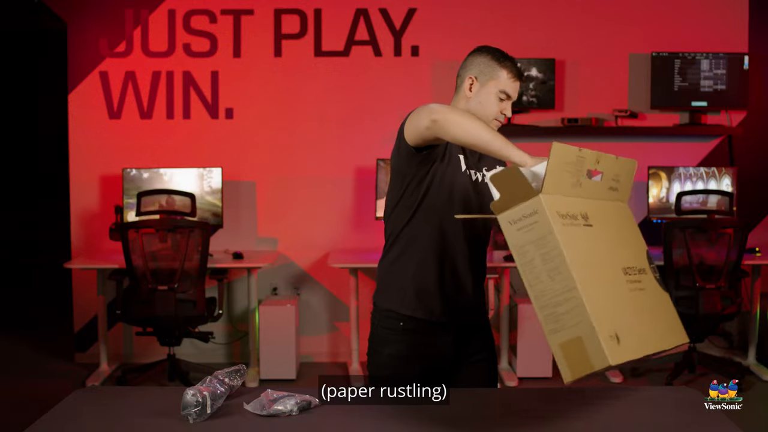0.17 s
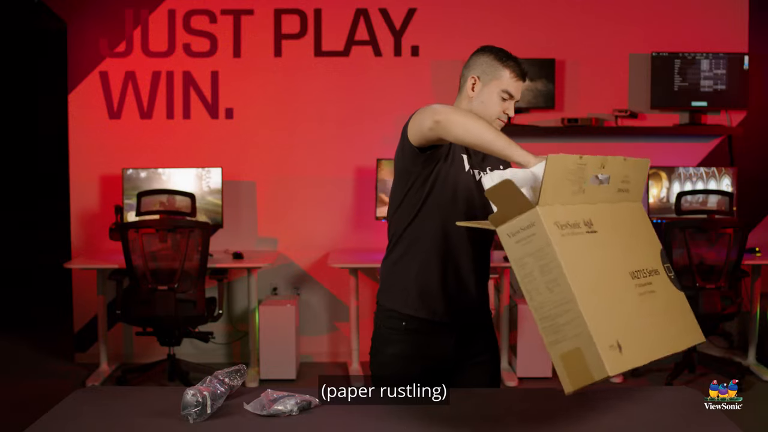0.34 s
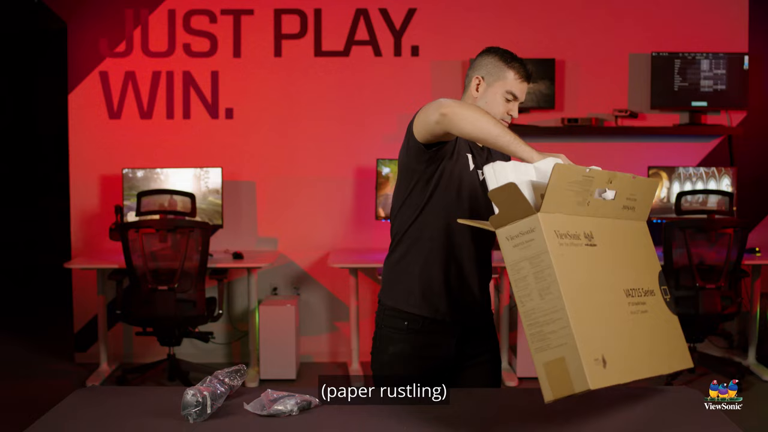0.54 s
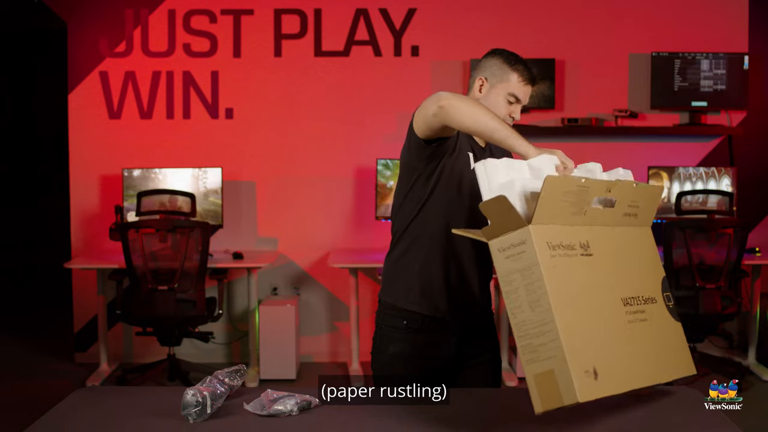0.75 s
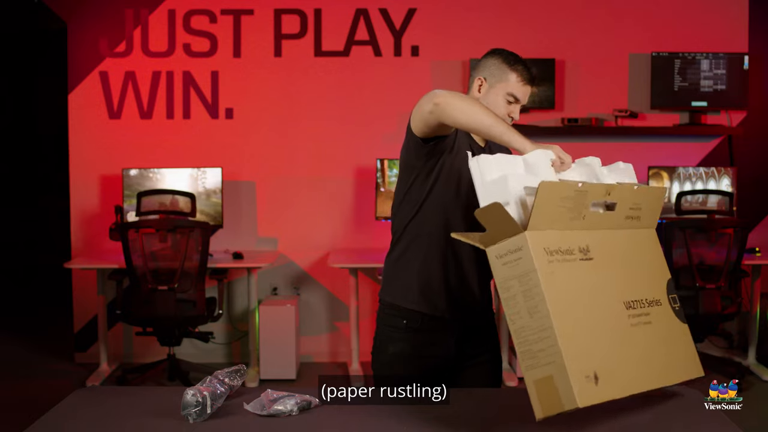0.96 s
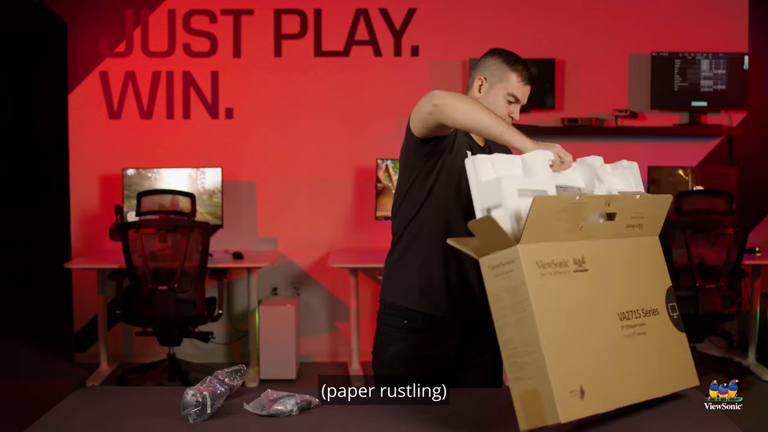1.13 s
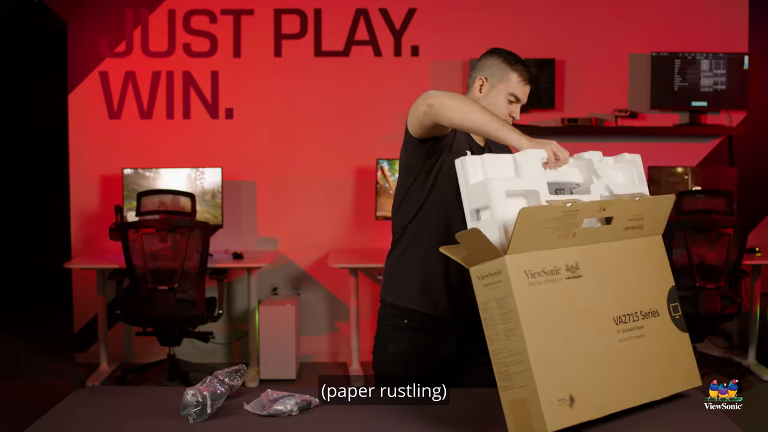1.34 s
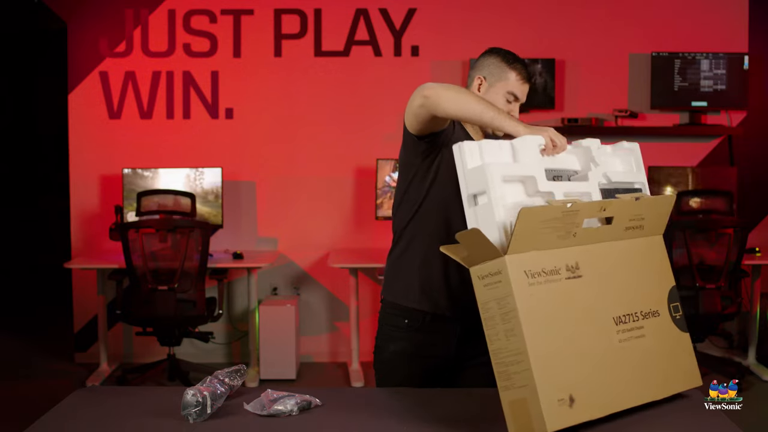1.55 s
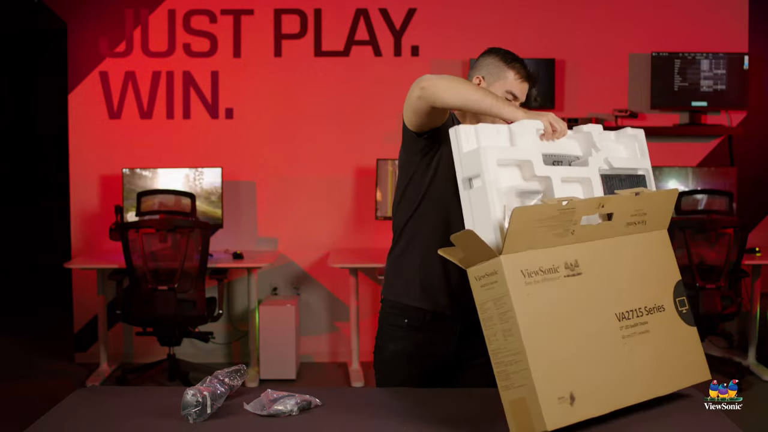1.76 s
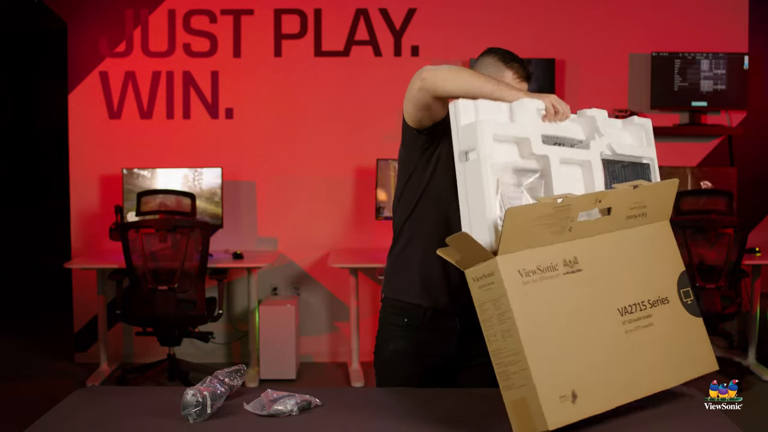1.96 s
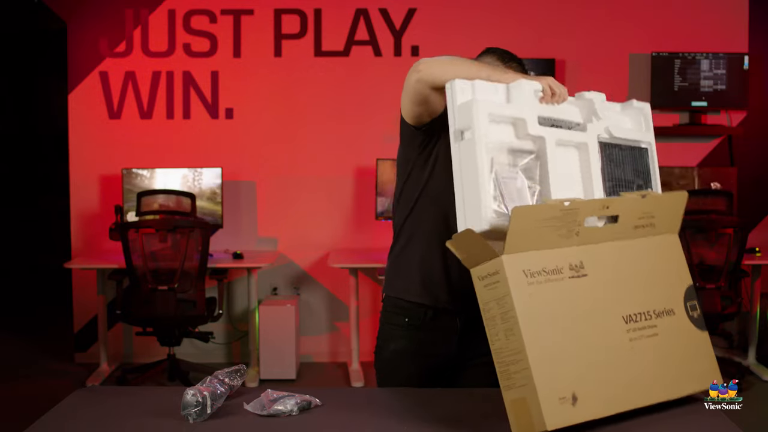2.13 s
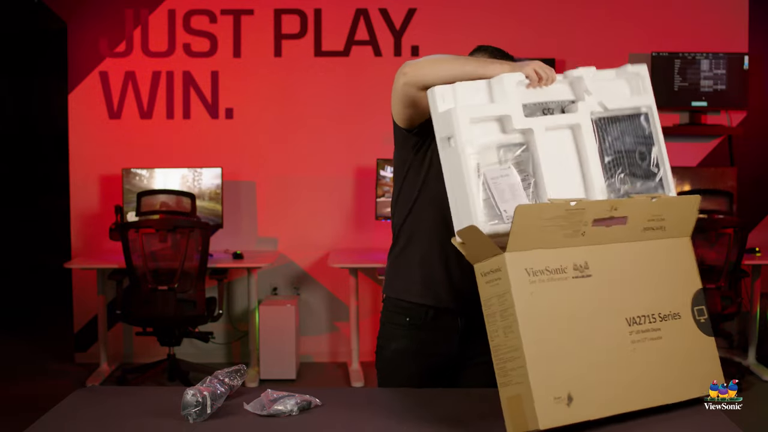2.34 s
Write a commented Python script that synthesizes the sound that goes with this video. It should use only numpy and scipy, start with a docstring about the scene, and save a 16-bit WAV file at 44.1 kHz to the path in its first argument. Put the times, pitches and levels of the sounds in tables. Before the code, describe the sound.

Foam packing hisses and scrapes out of a cardboard box, ending with a dull thump.

```python
"""Foam hisses against cardboard as a heavy item in foam end caps is pulled out of its box.
Countless slips of foam beads make the dense hiss, over two pulls that rasp and sing.
The packing crackles and snaps twice, the walls bump and groan as the foam catches, the hollow box
drops with a dull thump, and the freed foam brushes its flaps. Heard in mono in a damped room."""
import sys
import numpy as np
from scipy import signal
from scipy.fft import rfft, irfft
from scipy.io import wavfile
from scipy.ndimage import uniform_filter1d

SR = 44100
rng = np.random.default_rng(int(sys.argv[2]) if len(sys.argv) > 2 else 0)


def wav_out(sig):
    """Save sig, one row per channel (or a flat mono array), as 16-bit PCM at SR to the path in sys.argv[1]."""
    wavfile.write(sys.argv[1], SR, np.round(np.clip(np.atleast_2d(sig).T, -1, 1) * 32767).astype(np.int16))


N = 110250
T = np.arange(N) / SR
FREQS = np.arange(N // 2 + 1) * SR / N

# hiss envelopes, move by move (time [s], mids [dB], upper mids [dB], treble [dB], top [dB])
EASING_OUT = [(0.0, -45, -40.5, -35.5, -38), (0.052, -45, -41.5, -37.5, -38),
              (0.21, -43, -37, -34.5, -35.5)]
FIRST_PULL = [(0.31, -42, -37.5, -35.5, -39), (0.454, -42.5, -38.5, -35.5, -37),
              (0.85, -41, -35.5, -33.5, -36), (1.138, -41.5, -39, -32, -37.5),
              (1.205, -47, -42, -40.5, -43), (1.242, -46, -38.5, -33, -38), (1.28, -48, -43, -44, -48)]
SECOND_PULL = [(1.3, -50.5, -42, -34, -41.5), (1.344, -41.5, -36.5, -33.5, -35),
               (1.698, -38.5, -36.5, -34, -35.5), (1.732, -36.5, -30.5, -26, -29),
               (1.77, -38.5, -34, -35, -35.5), (1.91, -40, -34.5, -37, -34.5),
               (2.072, -43.5, -32.5, -27, -27.5), (2.166, -53.5, -42, -33, -37),
               (2.192, -47, -39.5, -34, -36), (2.2, -49, -44, -45, -42)]
# crossovers around those four bands (frequency [Hz])
BAND_EDGES_HZ = [900, 2800, 7000, 10500, 19000]
# tone of the foam's contact on each pull (frequency [Hz], gain [dB])
FIRST_PULL_EQ = [(530, -49), (900, -15), (1260, -16), (1560, -6.5), (2280, -4.5), (2790, -9), (3670, -8),
                 (5700, -12.5), (7400, -7), (8300, -3), (9800, -2.5), (12400, -6.5), (14000, -9.5),
                 (15500, -17.5)]
SECOND_PULL_EQ = [(530, -54), (1040, -22), (1620, -9), (2130, -1.5), (2750, -11.5), (3300, -12),
                  (6200, -11), (7900, -1), (9900, 0), (12100, 2.5), (14000, -3), (15500, -10)]
SLIPS_PER_S, SMOOTH_SHARE, PATCHY_DB = 8000, 0.56, 1.7
SECOND_PULL_S, FREE_S, FREE_T60_S = 1.29, 2.2, 0.083
# singing resonance of the rubbed foam (time [s], centre [Hz], level [dB])
SING = [(.45, 9400, -52), (.9, 9290, -33.5), (1.15, 9100, -36.5), (1.261, 8900, -58), (1.31, 8880, -32),
        (1.559, 8660, -33.5), (1.852, 8550, -56), (2.04, 9120, -28), (2.102, 9250, -23), (2.125, 9760, -34),
        (2.2, 9300, -62)]
# crackles and a brief ring at the first snap, then friction rasps and a tick
# (time [s], centre [Hz], width [Hz], level [dB], attack [s], t60 [s])
CRACKLES_AND_RASPS = [(.2185, 9900, 2600, -21, 0.00087, 0.011), (.2232, 10000, 1600, -19, 0.001, 0.014),
                      (0.2266, 3300, 800, -19, 0.00043, 0.016), (0.66, 1850, 1100, -39.5, 0.073, 1.9),
                      (1.47, 12300, 3220, -29, 0.069, 0.18), (1.685, 720, 506, -41, 0.003, 0.53),
                      (1.705, 11000, 4000, -37, 0.029, 0.099), (1.7, 11600, 1000, -33.5, 0.026, 1.2),
                      (2.221, 5200, 1700, -41.5, 0.0017, 0.19)]

# brushes on the flaps (time [s], level [dB], attack [s], hold [s], t60 [s])
SWISHES = [(2.364, -34.5, 0.0071, 0.051, 0.14), (2.433, -33, 0.037, 0.026, 0.33)]
# tone of a brush (frequency [Hz], gain [dB])
SWISH_EQ = [(530, -25), (1500, -14), (3000, -12.5), (10000, -8.5), (13200, -6), (15500, -13)]
# whistles in a brush (starting centre [Hz], width [Hz], gain [dB])
SWISH_WHISTLES = [(2350, 420, -15), (3330, 400, -15), (7160, 240, -19), (8940, 600, -8.5),
                  (12020, 1900, 0.5)]
SWISH_SAG_PER_S = 0.43

# snaps of the packing (time [s], crack level [dB], body level [dB])
SNAPS = [(0.2263, -18.5, -32.5), (0.2672, -17, -40.5)]
# tone of the crack (frequency [Hz], gain [dB])
SNAP_EQ = [(240, -42), (500, 3), (1000, -9.5), (1650, 6.5), (2800, -5), (5500, -14), (7500, -1.5),
           (10000, 1), (12500, -8), (15500, -9)]
# box modes rung by a snap (frequency [Hz], gain [dB], t60 [s])
SNAP_MODES = [(97.4, -11, 0.44), (166, -0.5, 0.11), (194.3, -6, 0.086), (509, 2.5, 0.038)]

# wall bumps and groans (time [s], pitch [Hz], level [dB], attack [s], t60 [s])
CATCHES = [(1.183, 92.7, -33, 0.013, 0.12), (1.284, 137, -29.5, 0.0021, 0.03),
           (1.317, 112, -30, 0.002, 0.042), (1.319, 188, -47.5, 0.011, 0.41),
           (1.735, 340, -28.5, 0.0187, 0.03), (1.925, 593, -25.5, 0.0036, 0.024),
           (1.946, 259, -37, 0.0068, 0.043), (1.989, 320, -35, 0.0093, 0.054),
           (2.02, 246, -32.5, 0.0082, 0.056), (2.076, 264, -28, 0.011, 0.045),
           (2.157, 258, -32, 0.0061, 0.055), (2.184, 607, -29, 0.004, 0.08),
           (2.365, 533, -32.5, 0.0012, 0.019), (2.363, 118.5, -33, 0.012, 0.12)]
CATCH_WOBBLE, CATCH_WOBBLE_HZ, CATCH_GRIT_DB = 0.031, 74.13, -15.5

# the box lands on one edge, then the other (time [s], level [dB])
LANDINGS = [(2.2, -17), (2.223, -30)]
# box modes rung by the drop (frequency [Hz], gain [dB], t60 [s])
BOX_MODES = [(63.2, 2, 0.26), (86, 8, 0.078), (115, 1.5, 0.16), (239.4, -2.5, 0.2), (354.7, -8, 0.15),
             (380, -12.5, 0.054), (445, -9, 0.075), (473, -8.5, 0.029), (575, -18, 0.095)]
THUD_DB, CLATTER_DB = -29, -47

# low drone of the rubbed box (time [s], hollow level [dB], panel level [dB], flap level [dB])
DRONE = [(0, -52, -63, -48), (.15, -67, -53.5, -57), (0.289, -37.5, -66, -47), (.38, -67.5, -62, -57),
         (1.66, -78.5, -86, -57.5), (1.74, -79, -56, -45), (1.86, -52.5, -49, -47.5),
         (2.04, -59, -45.5, -54.5), (2.18, -46, -37.5, -49), (2.338, -37, -49.5, -89),
         (2.41, -61, -51.5, -47), (2.5, -72, -51.5, -68)]
# tone of the quiet room (frequency [Hz], gain [dB])
ROOM_TONE_EQ = [(25, -11), (55, -0.5), (160, -12), (1000, -15.5), (4000, -43), (15000, -60)]
ROOM_TONE_DB, PREDELAY_S, HIGH_CUT_HZ = -54.5, 0.0079, 15900


def sliding_foam():
    """Foam drags over cardboard, hissing and singing through two pulls, and dies away once free."""
    times, *levels = np.vstack([EASING_OUT, FIRST_PULL, SECOND_PULL]).T
    crossfade = np.clip((T - SECOND_PULL_S) / 0.002, 0, 1)
    out = singing_foam()
    for eq, fader in [(FIRST_PULL_EQ, 1 - crossfade), (SECOND_PULL_EQ, crossfade)]:
        spectrum = rfft(colour(patchy(bead_slips()), eq))
        for db, lo, hi in zip(levels, BAND_EDGES_HZ, BAND_EDGES_HZ[1:]):
            out += fader * band(spectrum, lo, hi) * undb(np.interp(T, times, db))
    release = np.exp(-np.log(1000) * np.maximum(T - FREE_S, 0) / FREE_T60_S)
    return out * release


def bead_slips():
    """Countless tiny slips of foam beads tick over a smooth rub."""
    clicks = (rng.random(N) < SLIPS_PER_S / SR) * np.sign(noise())
    return np.sqrt(1 - SMOOTH_SHARE) * unit(clicks) + np.sqrt(SMOOTH_SHARE) * noise()


def patchy(x):
    """Narrow bands swell and fade on their own as the contact moves."""
    spectrogram = signal.stft(x, nperseg=512)[2]
    patches = uniform_filter1d(rng.standard_normal(spectrogram.shape), size=4, axis=0)
    patches = uniform_filter1d(patches, size=14, axis=1)
    return unit(signal.istft(spectrogram * undb(PATCHY_DB * unit(patches)))[1][:N])


def singing_foam():
    """A narrow resonance of the rubbed foam swells and shifts with the grip."""
    times, hz, db = np.array(SING).T
    return undb(np.interp(T, times, db)) * gliding(np.interp(T, times, hz), width_hz=1150)


def crackles_and_rasps():
    """Bursts of pitched noise: crackles and a brief ring at the first snap, friction rasps, a tick."""
    return sum(undb(db) * burst(start, attack, t60) * resonance(hz, width_hz)
               for start, hz, width_hz, db, attack, t60 in CRACKLES_AND_RASPS)


def flap_swishes():
    """The freed foam brushes the flaps; the whistles sink as each brush slows."""
    out = 0
    for start, db, attack, hold, t60 in SWISHES:
        sag = np.exp(-SWISH_SAG_PER_S * np.maximum(T - start, 0))
        whistles = sum(undb(gain) * gliding(hz * sag, width) for hz, width, gain in SWISH_WHISTLES)
        brush = unit(colour(bead_slips(), SWISH_EQ) + whistles)
        out += undb(db) * burst(start, attack, t60, hold) * brush
    return out


def packing_snaps():
    """The packing gives with a sharp crack that rings the box."""
    out = 0
    for start, crack_db, body_db in SNAPS:
        crack = burst(start, attack=0.00041, t60=0.017, hold=0.0015) * colour(noise(), SNAP_EQ)
        body = ring(SNAP_MODES, start, attack=0.0041)
        out += undb(crack_db) * crack + undb(body_db) * body
    return out


def wall_catches():
    """Caught by the foam, a wall swells into a gritty, wavering groan, holds and is let go."""
    out = 0
    for start, hz, db, attack, t60 in CATCHES:
        pitch = hz * (1 + CATCH_WOBBLE * drift(CATCH_WOBBLE_HZ))
        phase = 2 * np.pi * np.cumsum((T > start) * pitch) / SR
        grit = undb(CATCH_GRIT_DB) * resonance(1.1 * hz, width_hz=0.88 * hz)
        out += undb(db) * burst(start, attack, t60, hold=attack) * (np.sin(phase) + grit)
    return out


def box_drop():
    """The hollow box lands: its modes boom over a thud, and its flaps clatter faintly."""
    impact = LANDINGS[0][0]
    boom = sum(undb(db) * ring(BOX_MODES, start, attack=0.015) for start, db in LANDINGS)
    thud = burst(impact, attack=0.0021, t60=0.33) * resonance(hz=190, width_hz=250)
    clatter = burst(impact, attack=0.026, t60=0.54) * resonance(hz=2200, width_hz=12000)
    return boom + undb(THUD_DB) * thud + undb(CLATTER_DB) * clatter


def box_drone():
    """Rubbing stirs the air in the box, its panels and its flaps."""
    times, *levels = np.array(DRONE).T
    hollow = resonance(hz=194, width_hz=72)
    panels = resonance(hz=257, width_hz=150)
    flaps = resonance(hz=680, width_hz=470)
    return sum(undb(np.interp(T, times, db)) * part for db, part in zip(levels, [hollow, panels, flaps]))


def room(x, wet_db, t60):
    """The damped room adds a short, diffuse tail."""
    tail = noise() * burst(PREDELAY_S, attack=0.0018, t60=t60)
    tail /= np.sqrt(np.sum(tail ** 2))
    return x + undb(wet_db) * signal.fftconvolve(x, tail)[:N]


def room_tone():
    """A faint, dark bed of steady noise."""
    return undb(ROOM_TONE_DB) * colour(noise(), ROOM_TONE_EQ)


def undb(db):
    """Decibels to gain."""
    return 10 ** (np.asarray(db) / 20)


def unit(x):
    """Scale to rms 1."""
    return x / np.sqrt(np.mean(x ** 2))


def noise():
    """White noise."""
    return rng.standard_normal(N)


def drift(hz):
    """Smooth random modulation, rolled off above hz, at rms 1."""
    return unit(irfft(rfft(noise()) / (1 + (FREQS / hz) ** 4), N))


def colour(x, eq):
    """Shape a sound with an EQ curve, at rms 1."""
    hz, db = np.array(eq).T
    return unit(irfft(rfft(x) * undb(np.interp(np.log(FREQS + 1), np.log(hz), db)), N))


def band(spectrum, lo, hi):
    """One band of a sound, with soft edges, at rms 1."""
    return unit(irfft(spectrum / (1 + (lo / (FREQS + 1)) ** 16) / (1 + (FREQS / hi) ** 16), N))


def resonance(hz, width_hz):
    """Noise in a steep-sided resonance."""
    detune = (FREQS ** 2 - hz ** 2) / ((FREQS + 1) * width_hz)
    return unit(irfft(rfft(noise()) / (1 + detune ** 2), N))


def gliding(hz, width_hz):
    """Noise in a resonance whose centre sweeps."""
    phase = 2 * np.pi * np.cumsum(hz) / SR
    return unit(drift(width_hz / 2) * np.cos(phase) + drift(width_hz / 2) * np.sin(phase))


def burst(start, attack, t60, hold=0):
    """Attack, hold and decay envelope, timed in seconds."""
    age = T - start
    return np.clip(age / attack, 0, 1) * np.exp(-np.log(1000) * np.maximum(age - attack - hold, 0) / t60)


def ring(modes, start, attack):
    """Damped modes struck together."""
    return sum(undb(db) * burst(start, attack, t60) * np.sin(2 * np.pi * hz * (T - start))
               for hz, db, t60 in modes)


def scene():
    """The mono mix on both channels; the hiss dies sooner in the room than the knocks."""
    hiss = room(sliding_foam() + crackles_and_rasps() + flap_swishes(), wet_db=-15, t60=0.21)
    knocks = room(packing_snaps() + wall_catches() + box_drop(), wet_db=-10, t60=0.34)
    mono = hiss + knocks + box_drone() + room_tone()
    return np.array([mono, mono])


def record(dry):
    """A steep high cut takes the very top off the mix."""
    return signal.sosfilt(signal.ellip(10, .1, 80, HIGH_CUT_HZ, fs=SR, output="sos"), dry)


dry = scene()
out = record(dry)
wav_out(out)
```